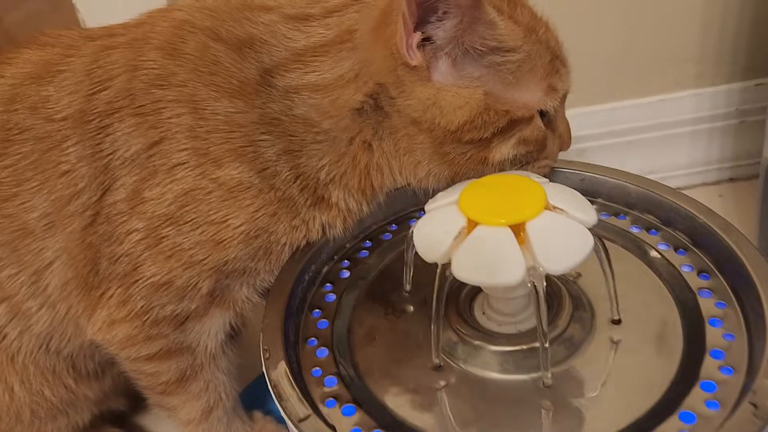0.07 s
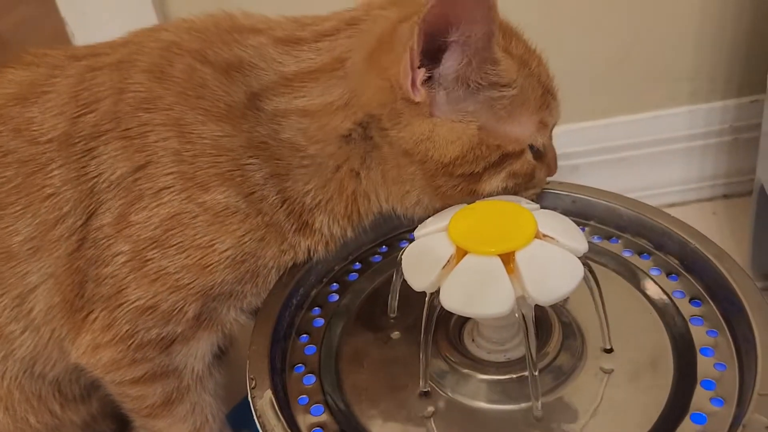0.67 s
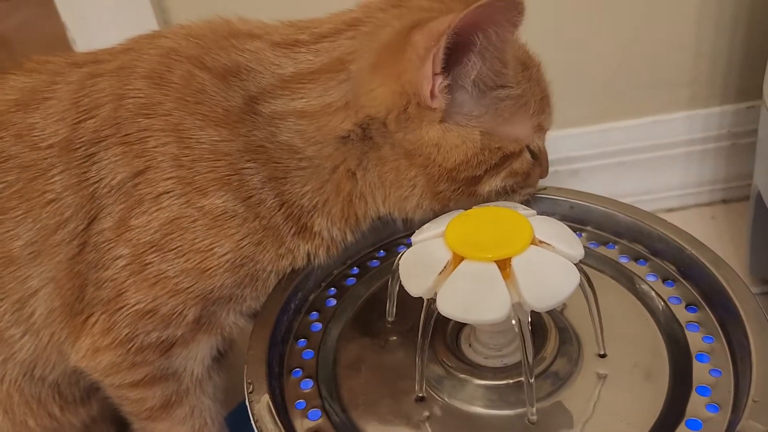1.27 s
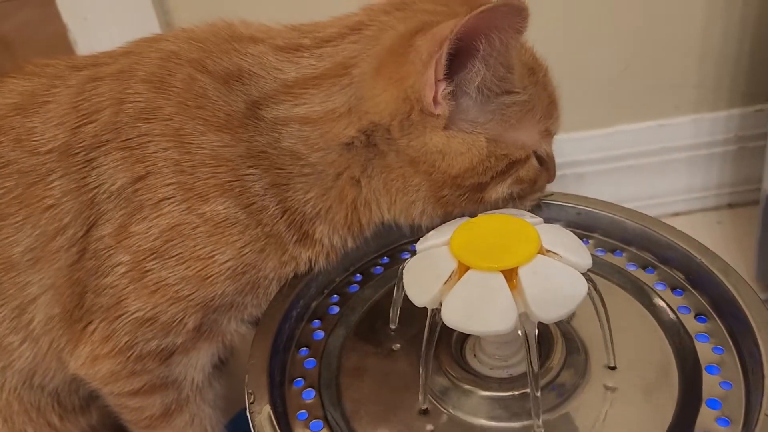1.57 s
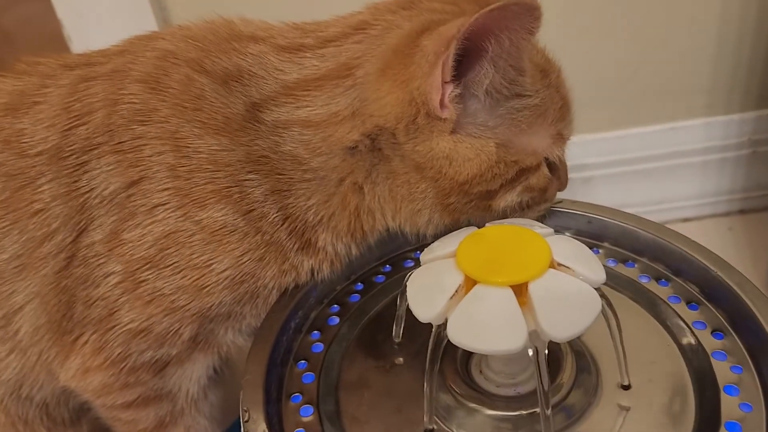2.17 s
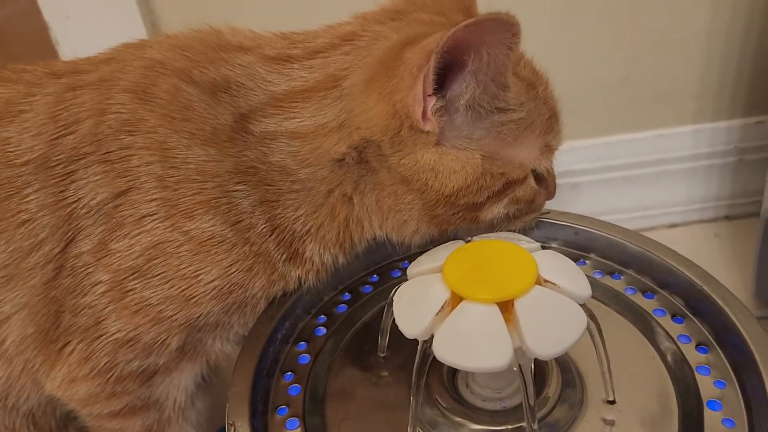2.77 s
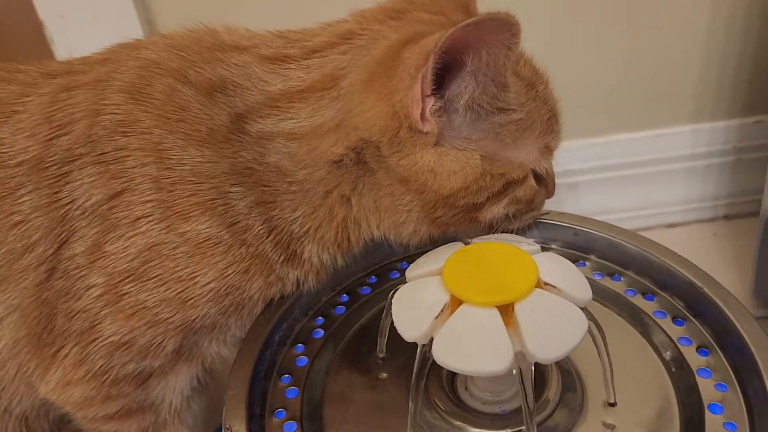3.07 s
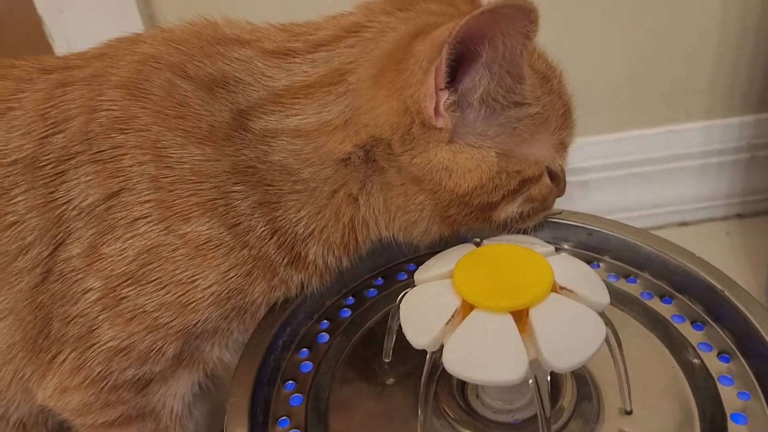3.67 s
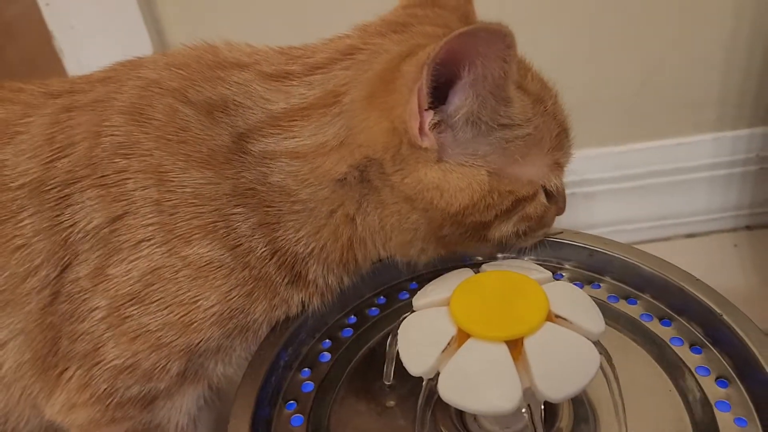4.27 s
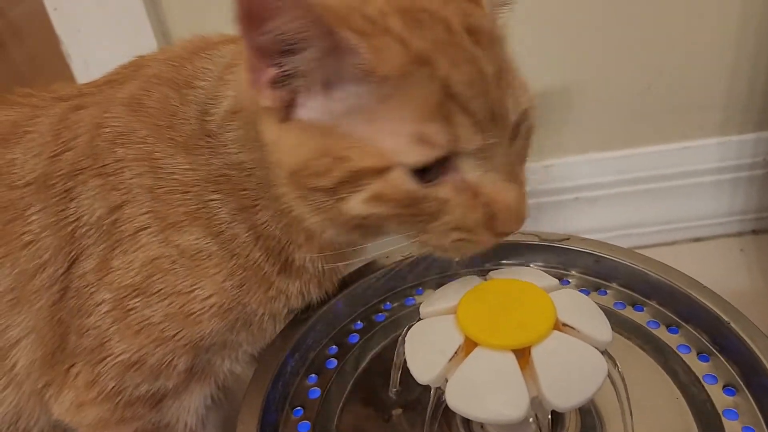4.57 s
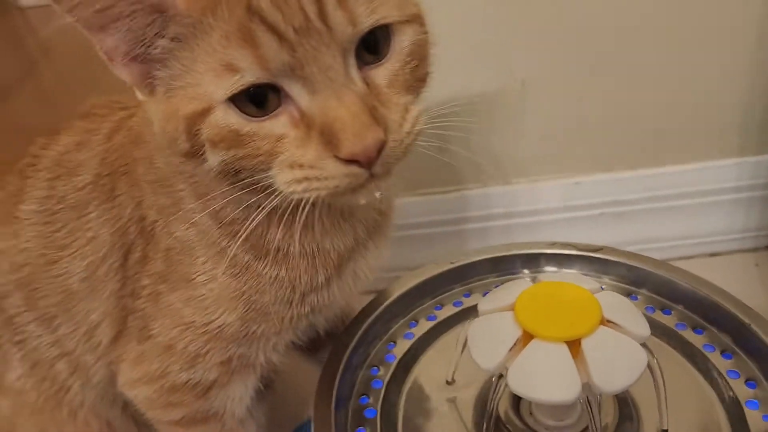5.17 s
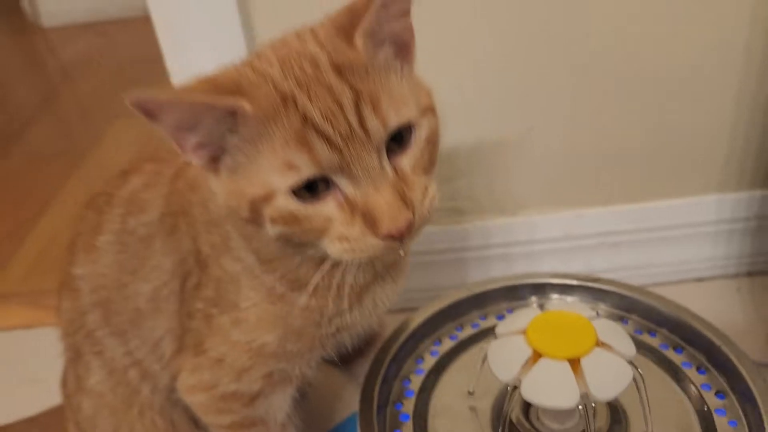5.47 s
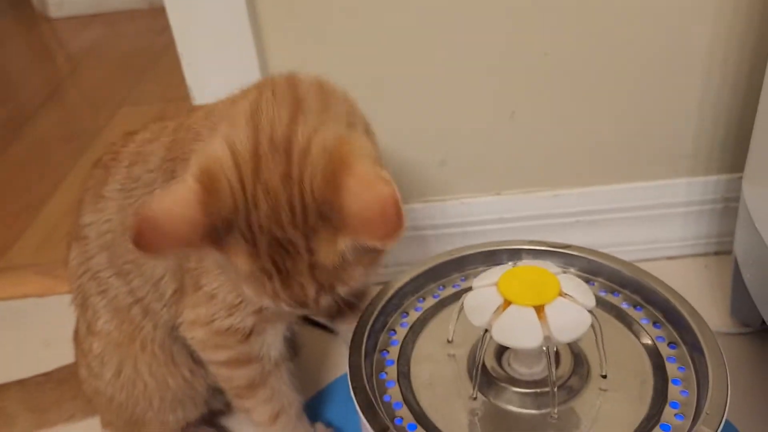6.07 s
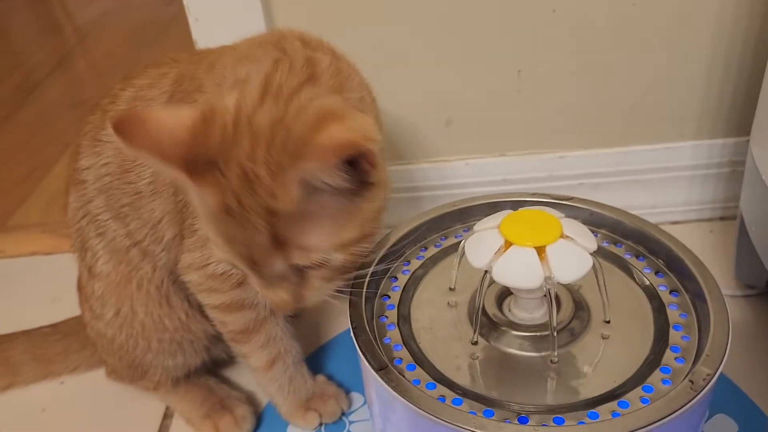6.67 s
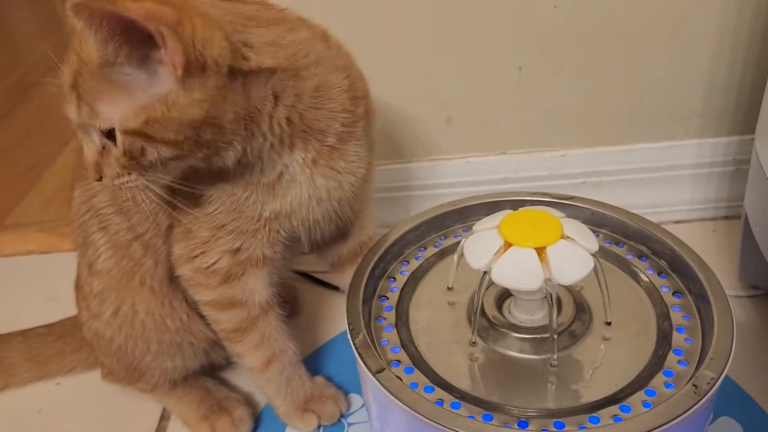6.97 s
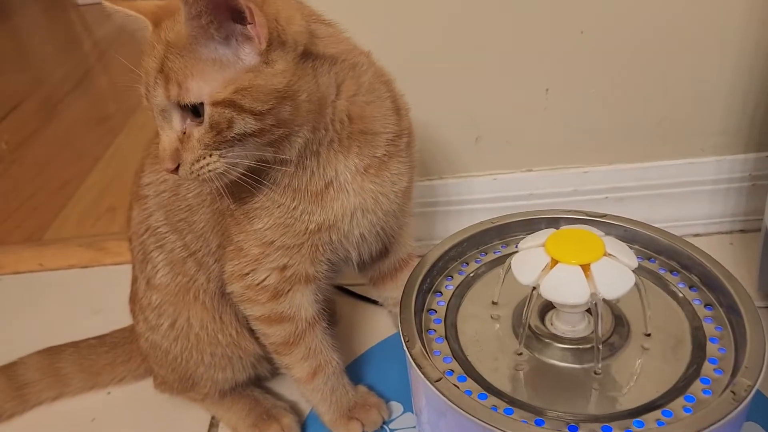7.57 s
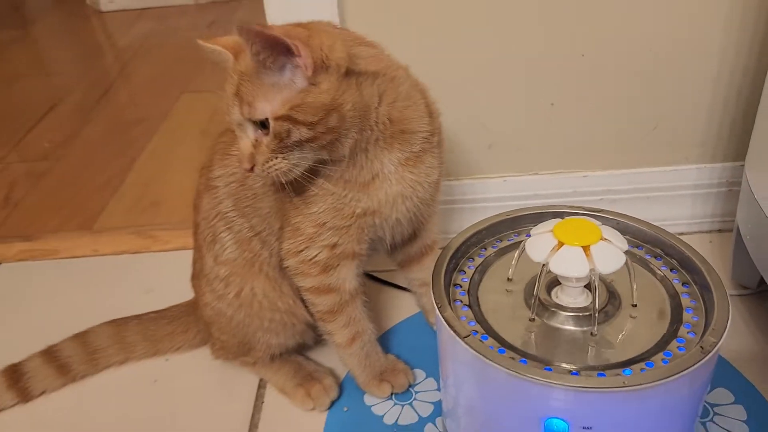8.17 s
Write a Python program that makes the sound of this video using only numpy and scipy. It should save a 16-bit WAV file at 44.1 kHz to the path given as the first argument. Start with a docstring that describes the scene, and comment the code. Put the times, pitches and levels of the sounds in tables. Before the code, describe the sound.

A small pet fountain trickles and hisses over a low pump hum while a cat laps faintly, with one bubble plip near the end.

```python
"""Water hisses and trickles over a low hum: a pet fountain is running in a tiled corner.
Thin jets splash on its steel tray and make it ring, water runs into the hollow tank, and the pump hums.
A cat laps with small smacks and squelches, then stops. Small bubbles ring and something bumps softly.
The listener leans in over the tray, then draws away; near the end one large bubble goes plip."""
import sys
import numpy as np
from scipy import signal
from scipy.fft import rfft, irfft, next_fast_len
from scipy.io import wavfile
from scipy.ndimage import uniform_filter1d, map_coordinates

SR = 44100
rng = np.random.default_rng(int(sys.argv[2]) if len(sys.argv) > 2 else 0)


def wav_record(signal):
    """Record a signal, one row per channel, as 16-bit PCM in the file named by sys.argv[1]."""
    frames = np.transpose(np.atleast_2d(signal))
    bounded = np.clip(frames, -1, 1)
    # unit amplitude maps onto the largest positive 16-bit level
    quanta = np.round(bounded * 32767).astype(np.int16)
    wavfile.write(sys.argv[1], SR, quanta)


N = 370881

# notes the steel tray rings at (pitch [Hz], width [Hz], strength close by [dB], strength far off [dB])
TRAY_MODES = [(4717, 128, -1, 9.5), (4880, 110, -9, 0.5), (4940, 45, 1, 1), (5110, 120, -6, 3),
              (5330, 53, 3, 5), (5470, 190, -9, 8), (5650, 79, -9, -8), (5870, 70, 2, -7),
              (6110, 27, -5, 6), (6460, 140, -3, -15), (6870, 73, -14, -8), (7270, 110, -3, -4.5),
              (7880, 164, -3.5, 4), (8500, 91, -6, 8)]
# notes of the hollow tank and of its air gap (pitch [Hz], width [Hz], strength [dB])
TANK_MODES = [(421, 24, -2.5), (545, 41, -5), (609, 22, 2), (659, 16, 3), (703.5, 23.6, 6.5)]
GAP_MODES = [(1473, 32, -11.5), (1590, 15, -16.5), (1743, 17, -7.5), (1836, 22, -8.5), (1932.4, 42, 4),
             (1944, 29, -1), (2032, 20.5, 6.5), (2063, 30, 0), (2117, 23, 3), (2174, 30, -3)]
# tone colour of the splash, spray, room rumble, tray, tank and air gap (frequency [Hz], strength [dB])
SPLASH_COLOUR = [(800, -54), (1020, -18.5), (1150, -11.5), (1500, -8.5), (2350, 1.5), (3000, -20.5),
                 (3450, -2), (3950, -18.5), (4500, -16), (6200, 3.5), (7000, 3.5), (8800, 3.5), (9800, -11),
                 (16000, -34)]
SPRAY_COLOUR = [(6000, -39), (8300, -2), (9250, 7), (9850, 0), (10400, 6), (10900, 3.5), (11900, 4.5),
                (12700, 3), (14000, 2.3), (14550, 5.8), (15100, 3), (15700, 3.5)]
ROOM_COLOUR = [(15, -22), (35, -2.5), (52, -5.5), (78, 5), (105, 0), (130, -1), (162, -2), (180, -12.5),
               (240, -13.5), (265, -34), (360, -27), (700, -19), (950, -39), (3000, -68)]
TRAY_COLOUR = [(3000, -33), (4100, 6.5), (4600, 3.5), (9000, 1.5), (12000, -39)]
TANK_COLOUR = [(250, -20), (410, -4.5), (720, -6), (800, -15), (885, 0), (1000, -19.5), (1500, -5)]
GAP_COLOUR = [(800, -10.5), (1400, 0), (2150, -3.5), (2600, 1), (3500, -3)]
# moments when the jets hit the steel harder (time [s], half-length [s], boost to the ringing [dB])
SWELLS = [(1.106, 0.052, 0), (2.108, 0.03, 2), (2.815, .04, 1.6), (4.404, 0.22, 1.5), (4.63, 0.045, 1.5),
          (5.476, 0.07, 1.5), (5.687, 0.055, 1)]
# how loud the trickle, the tank's murmur and the pump's hum are (time [s], level [dB])
TRICKLE_LEVEL = [(0, -53), (3.7, -53.5), (4.6, -55), (5.5, -53.5), (7, -53), (8.41, -55)]
MURMUR_LEVEL = [(0, -73), (1, -71.5), (3.4, -71.3), (4.1, -68.7), (4.6, -68.3), (5.3, -69.3), (5.55, -72.6),
                (7.2, -73.2), (8.41, -71.7)]
HUM_LEVEL = [(0, -55), (.3, -58.5), (4.3, -59), (8.41, -59.5)]
# tongue smacks, squelches, spatters and the clearest small bubbles (time [s], level [dB], pitch [Hz])
LAPS = [(.925, -68, 1450), (.934, -61, 590), (1.718, -66, 1250), (2.773, -69.5, 1350), (2.991, -63.5, 1500),
        (3.257, -66.5, 1450), (3.552, -70, 1150), (3.693, -65.5, 1240), (4.015, -68, 1600),
        (4.225, -64.5, 1600), (5.288, -65.5, 1300)]
SQUELCHES = [(.938, -57.5, 2500), (.975, -58, 2220), (1.53, -68, 2620), (3.68, -66, 2750),
             (4.46, -69.5, 2950), (5.49, -68, 3050), (7.738, -63.5, 3400)]
SPATTERS = [(3.503, -53, 6500), (4.575, -54.5, 7100), (5.2, -52, 7360)]
BUBBLES = [(.425, -56, 3250), (.675, -55, 3750), (1.082, -48, 4450), (1.963, -54, 3310), (2.512, -53, 3320),
           (2.938, -56.5, 3700), (3.672, -55, 2560), (3.858, -56, 2700), (4.014, -56, 2560),
           (4.223, -46.5, 3130), (6.672, -45, 5040), (6.808, -52, 3750), (7.472, -54, 3750),
           (7.738, -49, 3680), (7.756, -54.5, 3080)]
# the cat's low brushing sounds, and soft bumps (time [s], level [dB])
BRUSHES = [(.45, -71.5), (.6, -73), (2.56, -72), (4.56, -71.5)]
BUMPS = [(.02, -59), (.085, -58.5), (3.35, -63), (5.995, -61.5)]
# faint whine of the pump and its housing (pitch [Hz], starting level [dB], final level [dB])
WHINE = [(102.5, -71, -72.5), (420.6, -78.5, -88), (440, -80, -89), (535, -88, -81.5), (660.5, -80, -81),
         (715.5, -78, -79)]
# the corner's echo (frequency [Hz], time to fade by 60 dB [s])
ECHO_FADE = [(200, .3), (1500, .3), (10000, .2)]
# how strongly reflections ripple the water's sound (frequency [Hz], relative depth [0 to 1])
RIPPLE_DEPTH = [(400, 0), (1300, .4), (2000, .2), (3000, .45), (4500, .42), (14000, .42)]
# how alike the two ears' signals are (frequency [Hz], correlation [-1 to 1])
EAR_LIKENESS = [(30, 0.85), (130, 0.89), (300, 0.58), (700, 0.49), (1100, -0.096), (2000, -0.017),
                (5000, 0.063), (9000, 0.004)]
# where the listener is (time [s], distance [0 closest to 1 farthest])
DISTANCE = [(0, 0.3), (1, 0.44), (3.9, 0.00062), (4.45, 0.07), (5.1, 0.26), (5.8, 0.89), (8.41, 1)]

# parts that change with distance (level close by [dB], change when farthest [dB])
RING_DB, SPLASH_DB, SPRAY_DB = (-51, -.43), (-55, .5), (-49.5, .4)
OCTAVE_DB, DRONE_DB = (-97, 24.5), (-83.5, 7.5)
PUMP_HZ, TOP_HZ = 140.07, 15760


def jets():
    """Thin jets ring the tray, splash and throw a fine spray; they waver and throb with the pump."""
    t = np.arange(N) / SR
    swell_db = sum(db * np.exp(-((t - s) / half) ** 2) for s, half, db in SWELLS)
    surge_db = .2 * wobble(9) + .2 * tone(PUMP_HZ, drift_hz=.5, flutter_db=1)
    ring = amp(heard(RING_DB) + swell_db + .59 * wobble(11)) * tray()
    splash_db = heard(SPLASH_DB) + .8 * wobble(12)
    splash = amp(splash_db) * spread(patter(5000, .61), colour(SPLASH_COLOUR))
    spray_db = heard(SPRAY_DB) + .36 * swell_db + .4 * wobble(22)
    spray = amp(spray_db) * spread(patter(8900, .16), colour(SPRAY_COLOUR))
    return amp(surge_db) * (ring + splash * pan(-.5) + spray * pan(1.8))


def tray():
    """Drops make the steel ring; from farther back, different notes stand out."""
    far_share = .25 + .59 * distance()
    drops = patter(2500, .26)
    close = resonate(drops, [(hz, width, db) for hz, width, db, _ in TRAY_MODES], TRAY_COLOUR)
    far = resonate(drops, [(hz, width, db) for hz, width, _, db in TRAY_MODES], TRAY_COLOUR)
    return (1 - far_share) * close * pan(-6.5) + far_share * far * pan(-1.7)


def trickle(kick_share=.17, jitter_s=.00035):
    """Falling water rings the tank's air gap; each turn of the pump gives it a slightly uneven kick."""
    kicks = np.zeros((2, N))
    turns = np.arange(int(N / SR * PUMP_HZ)) / PUMP_HZ
    for ear in kicks:
        at = (turns + jitter_s * rng.standard_normal(len(turns))) * SR
        ear[np.clip(at.astype(int), 0, N - 1)] = 1
    flow = np.sqrt(kick_share) * unit(kicks - kicks.mean()) + np.sqrt(1 - kick_share) * noise()
    return amp(curve(TRICKLE_LEVEL)) * resonate(flow, GAP_MODES, GAP_COLOUR)


def tank(gurgle_count=280, low_hz=470, high_hz=725):
    """Drops make the hollow tank murmur; bubbles gurgle at random, louder when the murmur swells."""
    level_db = curve(MURMUR_LEVEL)
    murmur = amp(level_db + 1.7 * wobble(17)) * resonate(patter(500, .35), TANK_MODES, TANK_COLOUR)
    gurgles = np.zeros((2, N))
    for when, pitch, softness in rng.random((gurgle_count, 3)):
        at = int(when * N)
        hz = low_hz + (high_hz - low_hz) * np.sqrt(pitch)
        gain = amp(level_db[at] + 6.5 - 10 * softness)
        add(gurgles, at / SR, gain * bubble(hz, t60=.06, rise=.02, swell=.006))
    return murmur + gurgles * pan(-1.4)


def plip(start_s=8.0603, peak_db=-31.2, hz=1595):
    """A large bubble breaks loose on the right and rings until it bursts; the tank hums on briefly."""
    attack_s, hold_s, release_s, left_delay_s = .0027, .0058, .0055, .0002
    out = puffs([(start_s, peak_db - 21, hz)], width=.05, attack=.03, t60=.19)
    t = np.arange(SR // 20) / SR - np.array([[left_delay_s], [0]])
    shape = np.interp(t, np.cumsum([0, attack_s, hold_s, release_s]), [0, 1, 1, 0])
    add(out, start_s, amp(peak_db) * shape * np.sin(2 * np.pi * hz * t))
    return out


def small_bubbles(faint_count=9, faint_hz=3200, scatter_octaves=.22, ring_cycles=91):
    """Small bubbles ring in the tray, each with a wet splat; the higher the note, the shorter it is."""
    faint = [(when * N / SR, -61, faint_hz * 2 ** (scatter_octaves * (2 * pitch - 1)))
             for when, pitch in rng.random((faint_count, 2))]
    rows = BUBBLES + faint
    out = puffs([(s, db - 12.5, hz) for s, db, hz in rows], width=.27, attack=.002, t60=.06)
    for s, db, hz in rows:
        add(out, s, amp(db - 3.5) * bubble(hz, t60=ring_cycles / hz, rise=.04, swell=.002))
    return out


def cat(brush_hz=235):
    """Each lap traps air that rings briefly; stirred water squelches; the cat shifts with soft brushes."""
    smacks = puffs(LAPS, width=.6, attack=.006, t60=.07)
    for s, db, hz in LAPS:
        add(smacks, s, amp(db - 5) * bubble(hz, t60=.016, rise=.08, swell=.0015))
    squelches = puffs(SQUELCHES, width=.16, attack=.012, t60=.24)
    brushes = puffs([(s, db, brush_hz) for s, db in BRUSHES], width=.2, attack=.15, t60=.45)
    return smacks + squelches + brushes


def spatters():
    """The jets spatter briefly when they are disturbed."""
    return puffs(SPATTERS, width=.45, attack=.0035, t60=.12)


def bumps(hz=205):
    """Something bumps with a soft, low thud."""
    return puffs([(s, db, hz) for s, db in BUMPS], width=.35, attack=.01, t60=.16)


def pump():
    """The spinning pump hums, wavering with its load; its octave and housing drone grow with distance."""
    hum = amp(curve(HUM_LEVEL)) * tone(PUMP_HZ, drift_hz=.4, flutter_db=.8)
    octave = amp(heard(OCTAVE_DB)) * tone(2 * PUMP_HZ, drift_hz=2.2, flutter_db=2.2)
    whine = sum(amp(np.linspace(first_db, last_db, N)) * tone(hz, drift_hz=5, flutter_db=3, rate=24)
                for hz, first_db, last_db in WHINE)
    drone_db = heard(DRONE_DB) + 2.7 * wobble(3.81)
    drone = amp(drone_db) * spread(noise(), lambda hz: resonance([(305, 60, 0)], hz) ** 2)
    return hum + octave + whine + drone * pan(3.9)


def standing_waves(x, ripple_db=17.5, patch_db=.85):
    """Reflections lift some pitches and dip others, in fine ripples and broad patches that drift."""
    frames = dict(nperseg=2048, noverlap=1536)
    hz, t, spectrum = signal.stft(x, SR, **frames)
    hz = hz[:, None]

    def drifting(bins):
        field = uniform_filter1d(rng.standard_normal(spectrum.shape), size=bins, axis=1)
        return unit(uniform_filter1d(uniform_filter1d(field, size=36, axis=2), size=20, axis=2))

    ripple = amp(ripple_db * along(RIPPLE_DEPTH, hz) * drifting(bins=2))
    ripple /= np.sqrt(uniform_filter1d(ripple ** 2, size=7, axis=1))  # peaks and dips even out
    # the hiss around 6900 Hz fades as the listener draws back
    far = np.interp(t * SR, np.arange(N), distance())
    fading_db = np.exp(-((hz - 6900) / 1100) ** 2) * (.6 * (1 - far) - 1.3 * far)
    patches = amp(patch_db * drifting(bins=22) + fading_db)
    return signal.istft(spectrum * ripple * patches, **frames)[1][:, :N]


def corner_echo(x):
    """The tiled walls send the sound back; the highest pitches die first."""
    hz, t, spectrum = signal.stft(rng.standard_normal((2, SR // 2)), SR, nperseg=256)
    fade = amp(-60 * t / along(ECHO_FADE, hz)[:, None])
    tail = signal.istft(spectrum * fade, SR, nperseg=256)[1]
    tail = np.pad(tail / np.linalg.norm(tail[0]), ((0, 0), (SR // 200, 0)))  # arrives 5 ms late
    return signal.fftconvolve(x, tail, axes=1)[:, :N]


def room_rumble():
    """A faint, steady rumble fills the room."""
    return amp(-64) * spread(noise(), colour(ROOM_COLOUR))


def bubble(hz, t60, rise, swell):
    """Trapped air swells into a note that rises in pitch; t60 is the seconds it takes to fade 60 dB."""
    t = np.arange(SR // 5) / SR
    shape = (1 - np.exp(-t / swell)) ** 2 * amp(-60 * t / t60)
    return shape / shape.max() * np.sin(2 * np.pi * hz * t * (1 + rise * t / t60))


def puffs(rows, width, attack, t60):
    """Soft contacts: one short burst of noise per row, its width given as a share of its pitch."""
    out, t = np.zeros((2, N)), np.arange(SR // 2) / SR
    hz = np.fft.rfftfreq(len(t), 1 / SR)
    shape = (1 - np.exp(-t / attack)) * amp(-60 * t / t60)
    for s, db, centre in rows:
        band = resonance([(centre, centre * width, 0)], hz) ** 2
        burst = irfft(rfft(rng.standard_normal(len(t))) * band, len(t))
        add(out, s, amp(db) * unit(burst) * shape / shape.max())
    return out


def patter(rate, share):
    """Tiny drop hits, rate a second, carry a share of the power; the rest is a smooth rush."""
    hits = noise() * (rng.random((2, N)) < rate / SR)
    return np.sqrt(share) * unit(hits) + np.sqrt(1 - share) * noise()


def tone(hz, drift_hz, flutter_db, rate=7):
    """A pure note whose pitch and level waver about rate times a second."""
    phase = 2 * np.pi * np.cumsum(hz + drift_hz * wobble(rate)) / SR
    return unit(np.sin(phase) * amp(flutter_db * wobble(rate)))


def resonance(modes, hz):
    """How strongly an object with these ringing notes responds at each frequency."""
    return np.sqrt(sum(amp(2 * db) / (1 + ((hz * hz - centre * centre) / (hz * width + 1e-9)) ** 2)
                       for centre, width, db in modes))


def resonate(pair, modes, tint):
    """Pass two noises through an object's ringing notes and its tone colour."""
    return spread(pair, lambda hz: resonance(modes, hz) * amp(along(tint, hz)))


def spread(pair, gain):
    """Colour two unrelated noises and share their bass between the ears, at an average level of 1."""
    def mid_side(hz):
        turn = np.arccos(along(EAR_LIKENESS, hz)) / 2
        return gain(hz) * np.array([np.cos(turn), np.sin(turn)])
    mid, side = filtered(pair, mid_side)
    return unit(np.array([mid + side, mid - side]))


def filtered(x, gain):
    """Turn each frequency up or down by gain(hz)."""
    size = next_fast_len(N + SR // 4)
    return irfft(rfft(x, size) * gain(np.fft.rfftfreq(size, 1 / SR)), size)[..., :N]


def colour(points):
    """Turn a tone colour table into a gain for any frequency."""
    return lambda hz: amp(along(points, hz))


def along(points, hz):
    """Read between the rows of a frequency table, on a pitch-like (log) scale."""
    freqs, values = np.transpose(points)
    return np.interp(np.log(hz + 1), np.log(freqs + 1), values)


def curve(points):
    """Join (time, value) points with straight lines, one value per sample."""
    return np.interp(np.arange(N) / SR, *np.transpose(points))


def distance():
    """How far back the listener is, 0 to 1."""
    return curve(DISTANCE)


def heard(levels):
    """A part's level in dB as the listener moves."""
    close_db, change_db = levels
    return close_db + change_db * distance()


def wobble(rate):
    """A smooth curve through rate random points a second."""
    return map_coordinates(rng.standard_normal(int(N * rate / SR) + 4), [np.arange(N) * rate / SR])


def noise():
    """Plain hiss, different in each ear."""
    return rng.standard_normal((2, N))


def amp(db):
    """Turn decibels into a multiplier."""
    return 10 ** (np.asarray(db) / 20)


def unit(x):
    """Scale to an average (rms) level of 1."""
    return x / np.sqrt(np.mean(x ** 2) + 1e-20)


def pan(db):
    """Gains that make the left ear db louder than the right."""
    return amp([[db / 2], [-db / 2]])


def add(out, s, sound):
    """Mix a sound in at s seconds."""
    part = out[:, max(round(s * SR), 0):][:, :sound.shape[-1]]
    part += sound[..., :part.shape[1]]


def scene():
    """Running water and the pump, with the short sounds, their echo and the room's rumble."""
    events = spatters() + bumps() + small_bubbles() + plip() + cat()
    background = amp(-13) * corner_echo(events) + room_rumble() + pump()
    water = jets() + trickle() * pan(.52) + tank() * pan(-.8)
    return standing_waves(water) + events + background


def record(dry):
    """Cut away everything above TOP_HZ."""
    return filtered(dry, lambda hz: hz < TOP_HZ)


dry = scene()
out = record(dry)
wav_record(out)
```